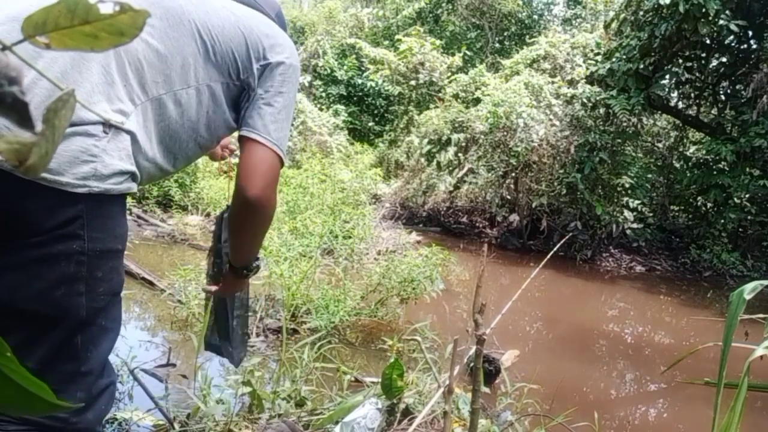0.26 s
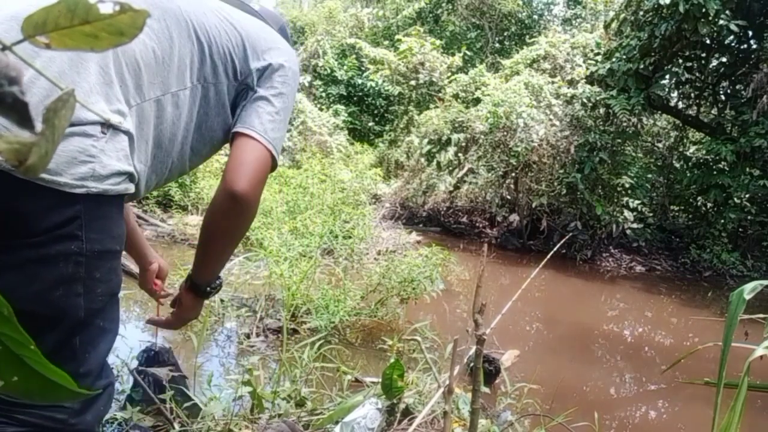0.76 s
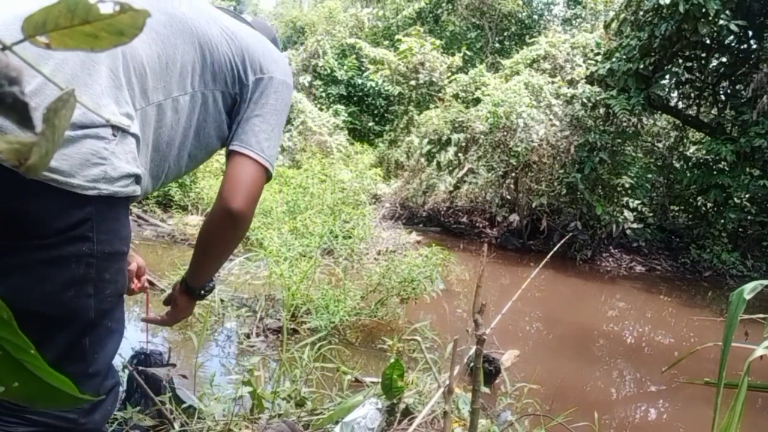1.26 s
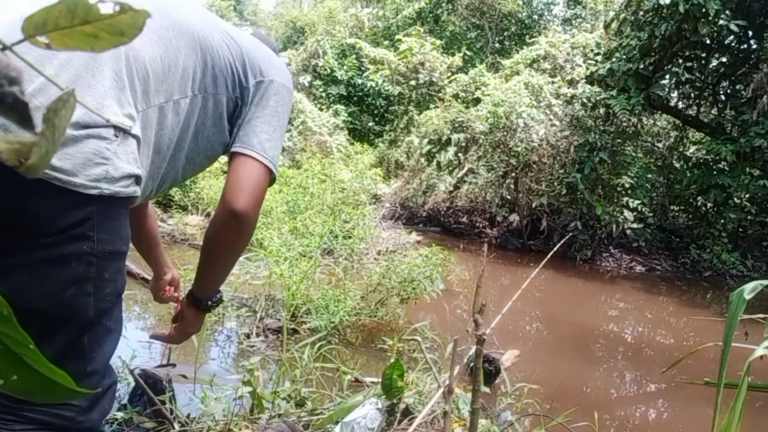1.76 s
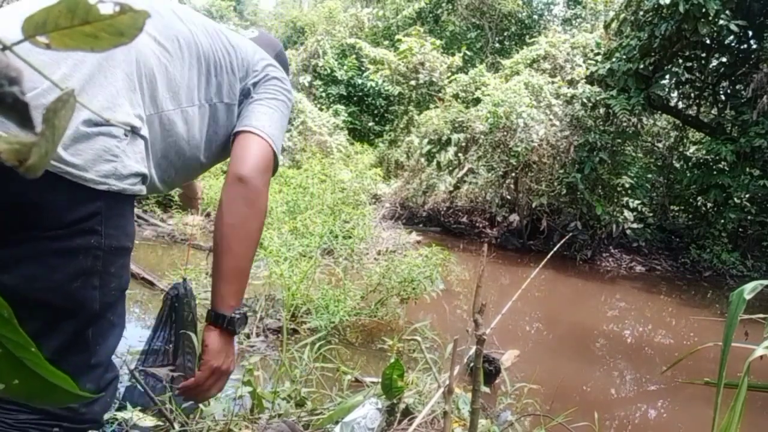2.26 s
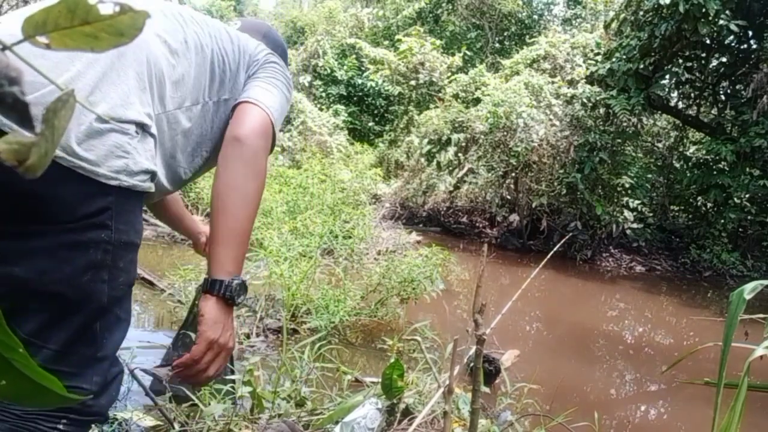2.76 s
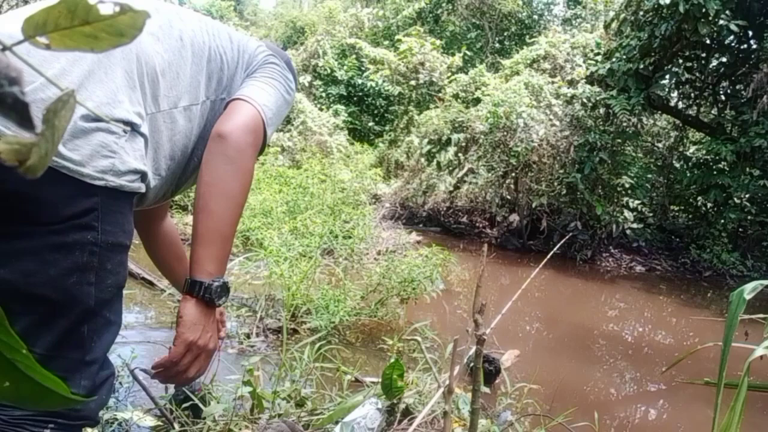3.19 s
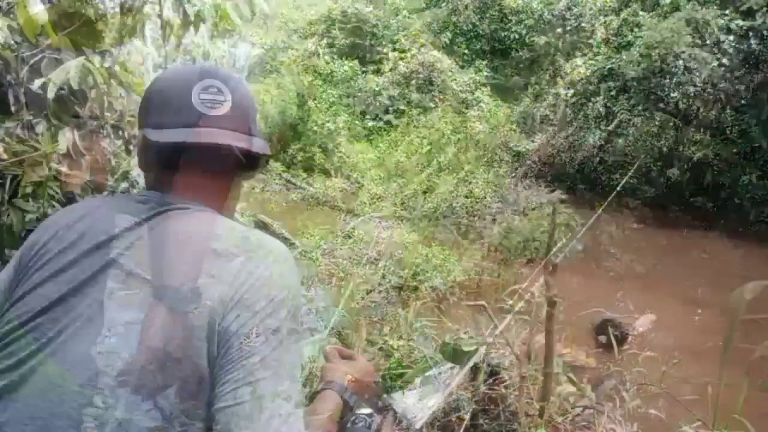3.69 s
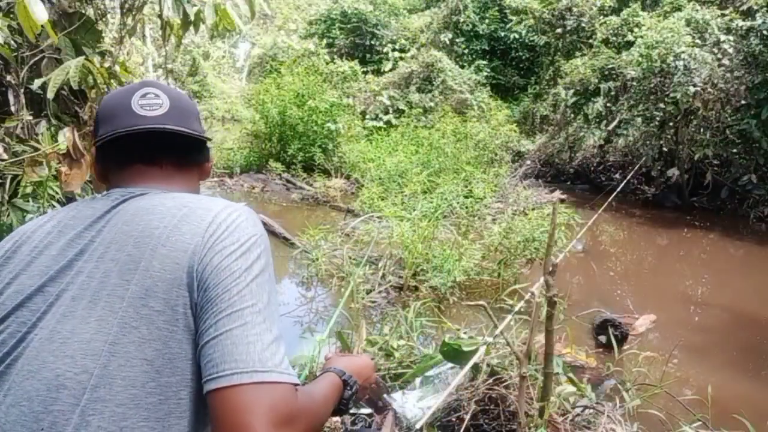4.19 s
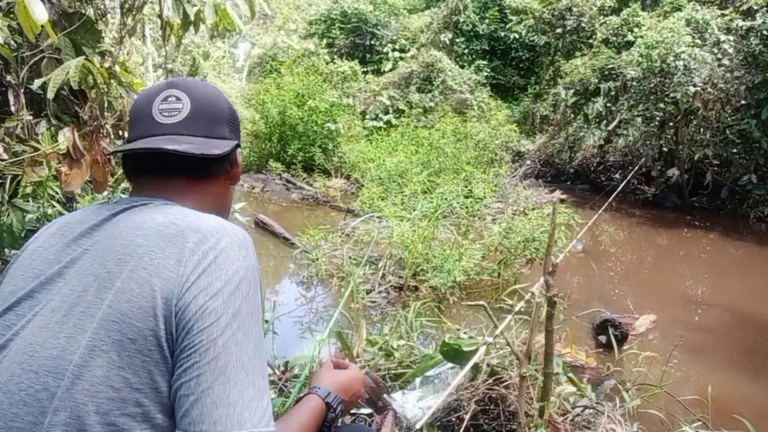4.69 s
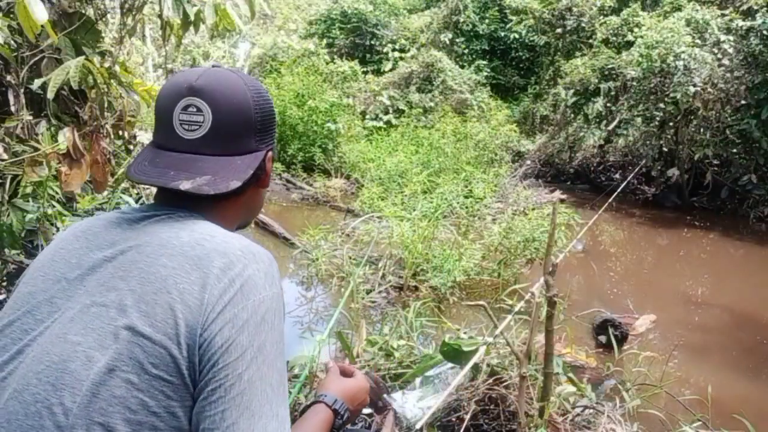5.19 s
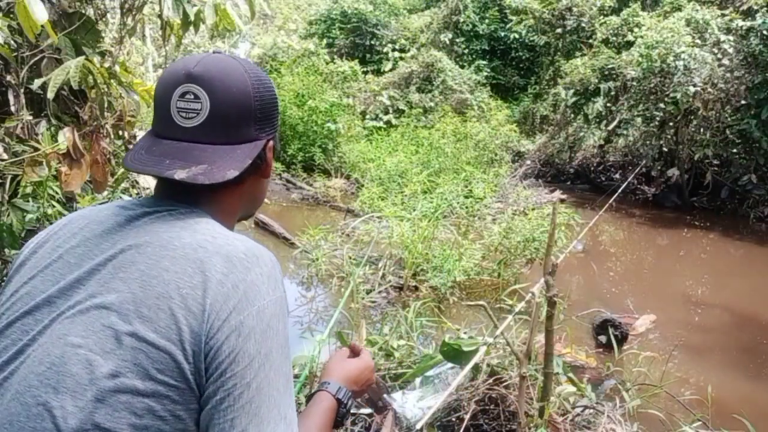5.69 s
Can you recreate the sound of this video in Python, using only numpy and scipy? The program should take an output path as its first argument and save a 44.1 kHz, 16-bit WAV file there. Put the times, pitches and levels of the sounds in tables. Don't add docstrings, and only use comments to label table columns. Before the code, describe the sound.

A dense, shrill cicada hiss around 8 kHz runs throughout, wide and distant, over a soft forest hush. On the left a katydid rasps fast, very high triplets until about 1.9 s, then returns, slightly faster, from 4.6 s to the end. A small crisp wet snap and mesh crackle occur at 0.6 s. Faint bird whistles slur upward at 0.35 and 2.0 s, with climbing notes between 1.0 and 2.3 s. From 2.25 s drops ring and the net rustles, sloshing, to the loudest event, a sharp splashy slap with a hollow thud at 2.65 s. Spray and crackle fade, with a smaller snap at 2.96 s. Low breeze rumble is strongest around 2 to 2.8 s. Soft hollow knocks at 4.0 s lead to a firm one at 4.1 s, then light rubbing. A wet double snap comes at 4.9 s, faint ticks at 5.15 and 5.36 s, and a plink with rustle at 5.8 s.

```python
import sys
import numpy as np
from scipy import signal
from scipy.fft import rfft, irfft, next_fast_len
from scipy.io import wavfile
from scipy.ndimage import uniform_filter1d, map_coordinates

SR = 44100
rng = np.random.default_rng(int(sys.argv[2]) if len(sys.argv) > 2 else 0)


def natural_amplitude(level_db):
    exponent = np.asarray(level_db, float) / 20
    return 10 ** exponent


def log_audio(samples):
    frames = np.atleast_2d(samples).T
    limited = np.clip(frames, -1, 1)
    pcm = np.round(limited * 32767).astype(np.int16)
    wavfile.write(sys.argv[1], SR, pcm)


N = 262350


def unit(x):
    return x / np.sqrt(np.mean(x ** 2, axis=-1, keepdims=True) + 1e-20)


def along(points, hz):
    f, v = np.transpose(points)
    return np.interp(np.log(hz + 1), np.log(f + 1), v)


def curves(rows):
    s, *cols = np.transpose(rows)
    return [np.interp(np.arange(N) / SR, s, c) for c in cols]


def wobble(rate, channels=2):
    knots = rng.standard_normal((channels, SR // 20))
    return np.array([map_coordinates(k, [np.arange(N) * rate / SR]) for k in knots])


def filtered(x, response):
    m = next_fast_len(N + SR // 4)
    return irfft(rfft(x, m) * response(np.fft.rfftfreq(m, 1 / SR)), m)[..., :N]


def coloured(x, spectrum):
    return unit(filtered(x, lambda hz: natural_amplitude(along(spectrum, hz))))


def crackle(rate, spread_db, noise):
    struck = rng.random((2, N)) < rate / SR
    size = natural_amplitude(spread_db * np.minimum(rng.exponential(size=(2, N)), 3))
    clicks = struck * size * rng.standard_normal((2, N))
    return unit(clicks) + noise * rng.standard_normal((2, N))


PORT_LAG = 7.67


def both(x):
    return np.array([np.roll(x, round(PORT_LAG)), x])


def near(pair, alike):
    def mix(hz):
        turn = np.arccos(np.clip(alike, 0, 1) / (1 + (hz / 3000) ** 2))
        return np.array([np.cos(turn), np.sin(turn)])
    right = filtered(np.asarray(pair), mix).sum(0)
    return np.array([np.roll(pair[0], round(PORT_LAG)), right])


def scattered(x, t60):
    t = np.arange(SR // 4) / SR
    tail = rng.standard_normal((2, len(t))) * natural_amplitude(-60 * t / t60)
    return signal.fftconvolve(np.atleast_2d(x), tail / np.linalg.norm(tail[0]), axes=1)[:, :N]


def swells(rows):
    t, out_db = np.arange(N) / SR, np.full(N, -140.)
    span_db = 30
    for s, db, rise, fall in rows:
        away = np.maximum((s - t) / abs(rise), (t - s) / abs(fall))
        out_db = np.maximum(out_db, db - span_db * away)
    return natural_amplitude(out_db)


def patchy(x, depth_db):
    z = signal.stft(x, nperseg=256)[2]
    field = uniform_filter1d(rng.standard_normal(z.shape[1:]), 4, 0)
    field = uniform_filter1d(field, 8, 1)
    return unit(signal.istft(z * natural_amplitude(depth_db * field / field.std()), nperseg=256)[1][:, :N])


def bubbles(rate, hz, cycles):
    at, pitch, size = rng.random((int(rate * N / SR), 3)).T
    t = np.arange(SR // 80) / SR
    f = hz * natural_amplitude(14 * (pitch[:, None] - .5))
    level = natural_amplitude(-3 * np.log(size[:, None] + 0.026))
    rings = level * np.sin(2 * np.pi * f * (t + 3 * t * t)) * np.exp(-t * f / cycles) * (1 - np.exp(-t * f))
    where = (at * N).astype(int)[:, None] + np.arange(len(t))
    return unit(np.bincount(where.ravel(), rings.ravel(), N)[:N])


# (time [s], level [dB])
CHORUS_LEVEL = [(0.0, -48), (0.61, -47.5), (1.62, -48), (2.92, -47), (3.36, -47), (3.71, -50.5),
                (3.96, -49), (4.11, -45.5), (4.24, -46), (5.77, -46), (5.95, -48)]
# (frequency [Hz], density [dB per Hz])
TYMBAL_BAND = [(3410, -94), (5800, -84), (6970, -13), (7290, -1.5), (7770, 6.5), (8210, -2), (8870, -18.5),
               (9890, -40.5), (10100, -73), (10500, -67), (13600, -102), (22000, -120)]
# (frequency [Hz], density [dB per Hz])
OVERTONE_BAND = [(12000, -63), (13500, -27), (14500, -14), (15000, -1), (15350, 1), (15700, -9)]


def cicadas():
    level_db = curves(CHORUS_LEVEL)[0]
    drive = 0
    for hz in (208, 218, 241):
        cycle = np.cumsum(hz * (1 + .02 * wobble(3)), axis=1) / SR % 1
        drive = drive + np.exp(-cycle / 0.5) * rng.standard_normal((2, N))
    drive = unit(drive) + .5 * rng.standard_normal((2, N))
    swell = natural_amplitude(1.3 * wobble(25))
    song = natural_amplitude([[-1.4], [1.4]]) * coloured(swell * drive, TYMBAL_BAND)
    overtone = natural_amplitude([[-15], [-21]]) * coloured(drive, OVERTONE_BAND)
    return natural_amplitude(level_db + 4) * (song + overtone)


# (place [share of triplet], width [share of triplet], level [dB])
WING_STROKES = [
    (.11, .055, -3),
    (.35, .06, 0),
    (.6, .08, -1),
]
# (frequency [Hz], density [dB per Hz])
WING_BAND = [(9500, -75), (10200, -21), (11000, -21), (12400, -14), (13800, -6), (14800, 2.5), (15430, 7),
             (15560, -25), (15900, -40)]
# (start [s], end [s], a triplet begins [s], rate then [triplets per s])
SONG_BOUTS = [
    (0, 1.947, .030, 20.05),
    (4.612, 6, 4.660, 21.45),
]
# time [s], width [s], level [dB]
FIRST_STROKE = (4.606, .006, -3)


def katydid():
    t = np.arange(N) / SR
    tiring = .345
    open_s, open_width, open_db = FIRST_STROKE
    stroke = natural_amplitude(open_db) * np.exp(-.5 * ((t - open_s) / open_width) ** 2)
    for start, end, first, rate in SONG_BOUTS:
        count = rate * (t - first) - tiring * (t - first) ** 2 / 2
        triplet = np.floor(count).astype(int)
        sizes_db = 0.98 * rng.standard_normal((200, len(WING_STROKES)))
        singing = (t >= start) * (t < end)
        for k, (at, width, db) in enumerate(WING_STROKES):
            pulse = np.exp(-.5 * ((count % 1 - at) / width) ** 2)
            stroke += singing * natural_amplitude(db + sizes_db[triplet, k]) * pulse
    rasp = natural_amplitude(-39.0) * unit(stroke * coloured(rng.standard_normal(N), WING_BAND))
    late = np.roll(uniform_filter1d(stroke, SR // 25), SR // 60)
    blur = late * coloured(rng.standard_normal(N), WING_BAND)
    rasp = rasp + natural_amplitude(-59.0) * unit(filtered(blur, lambda hz: 1 / (1 + (hz / 12840) ** 12)))
    direct = np.array([rasp, natural_amplitude(-17) * np.roll(rasp, 21)])
    return direct + natural_amplitude([[-11], [-15]]) * scattered(rasp, t60=.18)


# (time [s], level [dB])
HUSH_LEVEL = [(0, -72.5), (1.4, -73), (2.3, -71.5), (3.6, -74.5), (3.8, -80), (4.05, -71), (5.95, -69.5)]
# (frequency [Hz], density [dB per Hz])
HUSH_BAND = [(15, -39), (25, 11.5), (59, -4), (175, -4), (316, -7.5), (346, -8.5), (1020, -12.5),
             (1120, -13), (1470, -12), (5600, -17), (7280, -88.5), (12300, -120)]
# (time [s], peak level [dB])
BREEZE_PUFFS = [(.3, -75), (0.498, -70), (.68, -68.5), (0.821, -66.5), (1.08, -70.5), (1.25, -65),
                (1.47, -66), (1.761, -63.5), (1.88, -66), (2.0, -61), (2.2, -61.5), (2.38, -66),
                (2.56, -63.5), (2.67, -56), (2.85, -62.5), (3.05, -69.5), (3.5, -76), (3.71, -73),
                (4.12, -78), (5.699, -79.5)]
# (frequency [Hz], density [dB per Hz])
RUMBLE_BAND = [(18, -40), (30, -19.5), (75, 4), (91, 2), (118, -1), (150, -2), (260, -24), (340, -38.5),
               (570, -120)]


def forest():
    hush = coloured(near(rng.standard_normal((2, N)), alike=0.093), HUSH_BAND)
    hush = natural_amplitude(curves(HUSH_LEVEL)[0] - 0.5 + 1.3 * wobble(3.6)) * hush
    rise_s, fall_s, calm_db = .21, 0.19, -83.5
    breeze = natural_amplitude(calm_db) + swells([(s, db, rise_s, fall_s) for s, db in BREEZE_PUFFS])
    lumps = natural_amplitude(2.3 * wobble(9, channels=1))
    rumble = unit(lumps * coloured(near(rng.standard_normal((2, N)), alike=.6), RUMBLE_BAND))
    return hush + natural_amplitude(0.2) * breeze * rumble


# (time [s], peak level [dB], low part [dB], loudest frequency [Hz], t60 [s])
WATER_SNAPS = [(0.5926, -33, -28.5, 6440, 0.025), (1.9968, -38, -37, 3770, 0.034),
               (2.336, -37, -59, 3870, 0.043), (2.5286, -26.5, -32, 5970, 0.068),
               (2.541, -38, -42, 1712, 0.023), (2.6516, -16, -36, 3170, 0.027),
               (2.6544, -16, -15, 2640, 0.015), (2.6636, -30, -16, 3132, 0.03),
               (2.9062, -42.5, -45, 4100, 0.05), (2.9587, -31, -38, 5370, 0.024),
               (3.0826, -43.5, -55, 3250, 0.038), (4.8971, -30.5, -26.5, 2600, 0.074),
               (4.9381, -35, -12.5, 1750, 0.043), (5.1452, -48.5, -34, 2700, 0.046),
               (5.3607, -49.5, -36.5, 3530, 0.042), (5.8095, -43.5, -36, 2200, 0.23),
               (5.8686, -51.5, -25, 3720, 0.053)]
# (frequency [Hz], density [dB per Hz])
SLAP_BAND = [(88, -38.5), (150, -15), (254, -9), (662, -9.5), (1760, -2), (3040, 4), (4950, -7), (7770, -1),
             (9260, 1.5), (13200, -1.5), (16000, -8)]
# (time [s], peak level [dB], pitch
# [Hz], t60 [s])
DRIPS_AND_PLINKS = [(2.259, -39, 1765, 0.042), (2.267, -50.5, 1578, 0.1), (2.303, -53, 1710, 0.058),
                    (2.378, -43, 1490, 0.041), (2.41, -47.5, 1270, 0.082), (2.454, -41, 1330, 0.039),
                    (2.462, -37.5, 790, 0.046), (2.493, -37, 1220, 0.017), (2.528, -46.5, 560, 0.099),
                    (2.567, -35, 1354, 0.045), (2.579, -47.5, 875, 0.048), (2.604, -45.5, 873, 0.05),
                    (2.619, -37.5, 531, 0.024), (2.638, -43, 890, .02), (2.651, -29, 307, .07),
                    (2.651, -26.5, 613, 0.044), (2.714, -48, 1670, 0.05), (2.9597, -30, 2050, 0.023),
                    (2.989, -48.5, 720, 0.05), (3.1807, -47, 2332, 0.055),
                    (0.062, -67.5, 338, 0.13), (0.199, -69.5, 805, 0.11), (0.449, -68.5, 336, 0.17),
               (0.5919, -39, 1390, 0.024), (0.801, -57, 1650, 0.12), (3.9725, -57, 1124, 0.03),
               (3.9854, -40, 2760, 0.047), (4.0138, -58, 1470, 0.044), (4.0677, -54.5, 1073, 0.049),
               (4.107, -52.5, 1230, 0.079), (4.277, -49, 2283, 0.049), (4.734, -51.5, 877, 0.027),
               (4.7444, -55.5, 1320, 0.038), (5.091, -50.5, 199, 0.11), (5.3824, -57.5, 2840, 0.065),
               (5.8076, -46.5, 1904, 0.21)]


def splash():
    out, drops, t = np.zeros((2, N + SR)), np.zeros(N + SR), np.arange(SR // 5) / SR
    spray = coloured(crackle(4000, spread_db=-3, noise=0.74), SLAP_BAND)
    low = filtered(spray, lambda hz: 1 / (1 + (hz / 1300) ** 4))
    for k, (s, db, low_db, hz, t60) in enumerate(WATER_SNAPS):
        part = slice(k * len(t), (k + 1) * len(t))
        focus = signal.lfilter(*signal.iirpeak(hz, 3, SR), spray[:, part])
        burst = 0.48 * unit(spray[:, part] - low[:, part]) + 1.09 * unit(focus)
        burst = burst + natural_amplitude(low_db + 10.5) * unit(low[:, part])
        decay = natural_amplitude(db - 6.5 - 60 * t / np.clip(t60, .008, .2))
        strike = 1 + 0.98 * natural_amplitude(-60 * t / 0.0043)
        out[:, round(s * SR):][:, :len(t)] += decay * strike * burst
    for s, db, hz, t60 in DRIPS_AND_PLINKS:
        ring = np.sin(2 * np.pi * hz * (t + 0.5 * t * t)) * (1 - np.exp(-t / 0.00094))
        drops[round(s * SR):][:len(t)] += natural_amplitude(db + 3.0 - 60 * t / np.clip(t60, .01, .3)) * ring
    return near(out[:, :N], alike=0.95) + both(drops[:N])


# (start [s], length [s], first pitch [Hz], last pitch [Hz], peak level [dB])
RISING_SLURS = [
    (0.346, 0.233, 1780, 2131, -60.5),
    (2.029, 0.18, 1768, 2153, -65.5),
]
CLIMBING_NOTES = [
    (1.029, 0.11, 2530, 2700, -72),
    (1.3, 0.19, 2610, 2817, -68.5),
    (1.571, .22, 2744, 2897, -64.5),
    (1.85, 0.153, 2744, 2840, -64),
    (2.091, 0.19, 2810, 3040, -62.5),
]
SHORT_PIPS = [
    (1.42, 0.058, 1740, 1703, -77),
    (3.581, 0.18, 1730, 1700, -84),
    (3.82, 0.075, 1520, 1450, -75.5),
    (4.26, 0.053, 1725, 1715, -74.5),
    (4.42, 0.21, 1720, 1770, -84.5),
]
# (loudest at [share of note], start below peak [dB], end below peak [dB])
NOTE_SHAPES = [
    (0.77, 29, 5),
    (0.27, 7, 16.5),
    (.3, 9, 16.5),
]


def birds():
    song, smear, drift = np.zeros((2, N)), wobble(260), wobble(260)
    singers = (RISING_SLURS, CLIMBING_NOTES, SHORT_PIPS)
    for notes, (top, in_db, out_db) in zip(singers, NOTE_SHAPES):
        for s, length, first_hz, last_hz, db in notes:
            u = np.linspace(0, 1, round(length * SR))
            at = round(s * SR) + np.arange(len(u))
            pitch = first_hz + (last_hz - first_hz) * u ** 0.67
            turn = 2 * np.pi * np.cumsum(pitch) / SR
            shape_db = np.interp(u, [0, np.clip(top, .05, .95), 1], [-in_db, 0, -out_db])
            level = uniform_filter1d(natural_amplitude(db + shape_db + 4.0), 700, mode="constant")
            tone = (1.08 + 0.41 * smear[:, at]) * np.sin(turn) + 0.93 * drift[:, at] * np.cos(turn)
            song[:, at] += level * tone
    return natural_amplitude(-4) * song + natural_amplitude(-1.0) * scattered(song, t60=0.51)


# (peak time [s], spray level [dB], rise [s], fall [s], crackle over spray [dB])
NET_RUSTLES = [(.604, -50, 0.037, 0.11, 7.5), (.75, -61, .05, 0.2, 2.5), (0.831, -70.5, .15, 0.1, 14.5),
               (1.842, -80, 0.042, 0.18, 14), (2.002, -68, 0.088, .12, 9), (2.036, -65, 0.16, 0.36, -11),
               (2.314, -65.5, 0.55, .1, -13), (2.342, -59, 0.051, .1, -17), (2.546, -49, 0.35, 0.63, -4.5),
               (2.656, -30.5, 0.028, 0.04, 1.9), (2.686, -53, .03, 0.19, 3.5),
               (2.816, -52, 0.65, .21, -2.5), (2.958, -48, 0.007, 0.21, -1.5), (3.471, -73, .06, .25, -3),
               (3.653, -75, 0.038, 0.31, 0), (4.109, -68.5, 0.28, 0.13, -25), (4.29, -77.5, .11, .06, -19),
               (4.898, -49, .012, .15, -12), (4.946, -57.5, 0.063, 0.041, 6.3),
               (5.136, -69.5, 0.028, 0.18, -25), (5.359, -65.5, 0.038, 0.14, -24),
               (5.826, -66, 0.064, 0.29, 8), (5.902, -66.5, 0.22, .06, -15)]
# (peak time [s], level [dB], rise [s], fall [s])
BAG_SLOSHES = [(.6, -61, .033, 0.076), (.79, -79, 0.29, 0.63), (2.002, -88, 0.092, 0.041),
               (2.314, -72, 0.42, .08), (2.376, -82, .07, 0.41), (2.544, -53, 0.2, .45),
               (2.634, -46, 0.24, .05), (2.654, -24.5, 0.022, 0.016), (2.684, -51.5, .05, 0.25),
               (2.816, -54.5, 0.52, 0.037), (2.958, -56, 0.0079, 0.22), (3.995, -65, 0.015, 0.27),
               (4.11, -56, 0.089, 0.073), (4.416, -73.5, .14, .04), (4.896, -50, 0.0092, 0.15),
               (4.948, -64, 0.15, .04), (5.122, -74, .4, .03), (5.36, -80.5, .3, .4),
               (5.826, -72, .16, 0.2)]
# (frequency [Hz], density [dB per Hz])
CRISP_BAND = [(3500, -30), (4800, -14.5), (5700, -9), (8000, 0.5), (11000, -8.5), (15000, -6)]
FIZZ_BAND = [(800, -53), (1500, -6.5), (2400, -3), (3700, -2), (4600, -6.5), (6000, -14.5), (9000, -42.5)]
SLOSH_BAND = [(250, -51.5), (500, -7), (900, 2.5), (1600, 5), (2500, -0.5), (4000, -39.5)]


def net():
    fizz, slosh = swells([row[:-1] for row in NET_RUSTLES]), swells(BAG_SLOSHES)
    crisp = swells([(s, db + over_db, rise, fall) for s, db, rise, fall, over_db in NET_RUSTLES])
    ticks = coloured(crackle(2200, spread_db=1, noise=0.72), CRISP_BAND)
    top = natural_amplitude(10.0) * crisp * patchy(ticks, depth_db=3.5)
    spray = coloured(crackle(1500, spread_db=0.0, noise=1.0), FIZZ_BAND)
    fine = natural_amplitude(5) * fizz * patchy(spray, depth_db=3.0)
    coarse = natural_amplitude(-2.0) * slosh * coloured(rng.standard_normal((2, N)), SLOSH_BAND)
    gurgle = natural_amplitude(-10.5) * slosh * bubbles(rate=240, hz=1380, cycles=2.03)
    return near(top + fine + coarse, alike=0.93) + both(gurgle)


# (time [s], peak level [dB])
GEAR_THUDS = [
    (2.651, -12.5),
    (2.979, -37),
    (4.01, -30),
    (4.053, -27),
    (4.106, -16),
    (5.085, -52),
]
# (peak time [s], level [dB], rise [s], fall [s])
GEAR_RUBS = [(3.97, -56, 0.02, 0.41), (4.04, -51.5, 0.065, 0.17), (4.118, -44, 0.12, 0.069),
             (4.14, -55, .05, 0.11), (4.27, -60, 0.098, 0.051), (4.398, -60, 0.13, 0.14),
             (4.636, -62, .07, 0.093), (4.774, -65.5, 0.12, 0.1), (4.944, -52.5, 0.058, .13),
             (5.09, -55.5, 0.089, 0.093)]
# (frequency [Hz], width [Hz], level [dB])
AIR_MODES = [(435, 96, 9), (623, 120, -0.5), (244.5, 47, -1.5), (286.7, 87, -2)]


def hollow():
    def body(f):
        modes = 0
        for k, (c, w, db) in enumerate(AIR_MODES):
            modes = modes + (-1) ** k * natural_amplitude(db) * 1j * f * w / (c * c - f * f + 1j * f * w)
        return modes
    blows = np.zeros(N)
    for s, db in GEAR_THUDS:
        blows[round(s * SR):][:30] = natural_amplitude(db - 7.5) * np.hanning(30)
    scrape = crackle(150, spread_db=-1.5, noise=0.72)[0]
    rub = swells(GEAR_RUBS) * unit(filtered(scrape, lambda f: body(f) ** 2))
    sound = natural_amplitude(-2.36) * rub + filtered(blows, body)
    return natural_amplitude([[-1], [1]]) * both(sound)


def scene():
    close = filtered(splash(), lambda hz: hz ** 2 / (hz ** 2 + 190 ** 2)) + hollow()
    far = cicadas() + katydid() + birds() + forest()
    return far + net() + close + natural_amplitude(-8.0) * scattered(close, t60=0.11)


def roll_off(x):
    return signal.sosfilt(signal.butter(12, 16870, fs=SR, output="sos"), x)


def record(dry):
    ceiling, top_hz, bass_hz = .5, 15680, 45
    rounded = dry / (1 + abs(dry / ceiling) ** 4) ** (1 / 4)
    heard = filtered(rounded, lambda hz: (hz < top_hz) * hz ** 2 / (hz ** 2 + bass_hz ** 2))
    return roll_off(heard)


dry = scene()
out = record(dry)
log_audio(out)
```